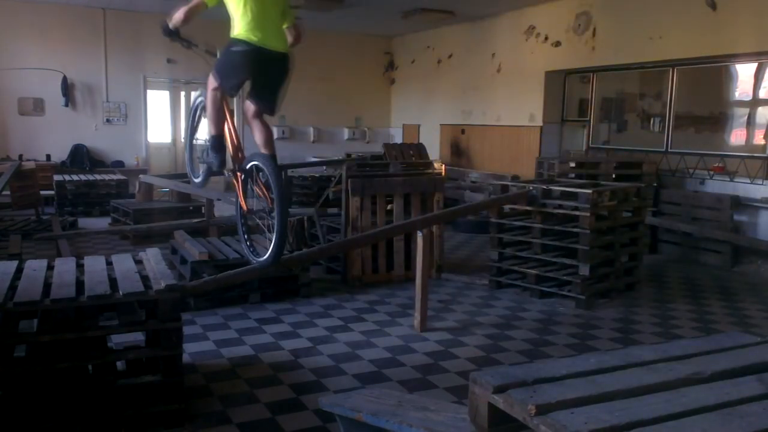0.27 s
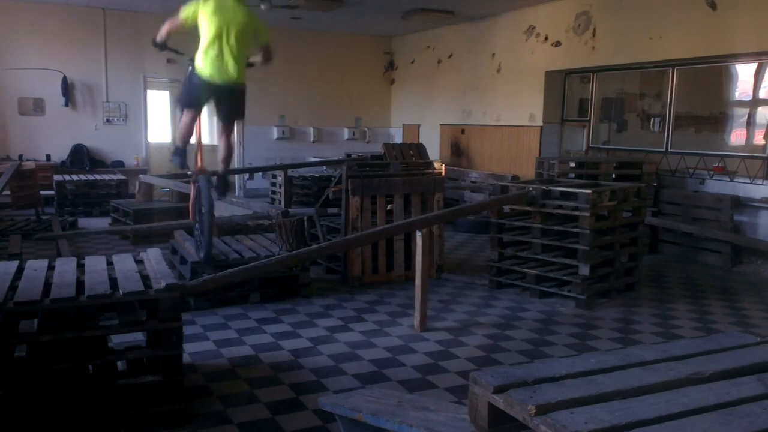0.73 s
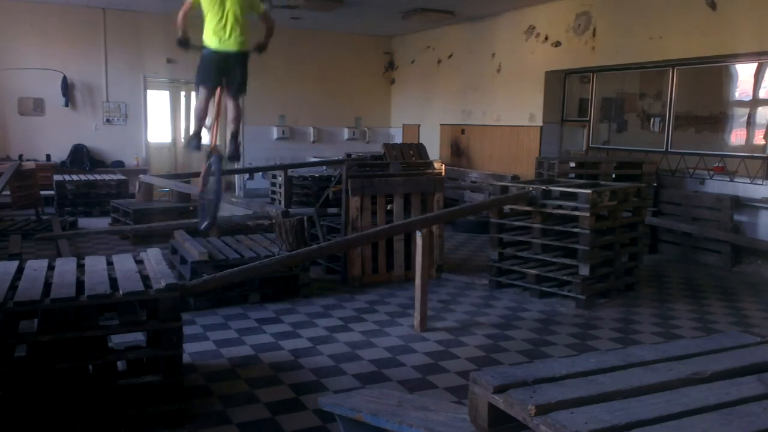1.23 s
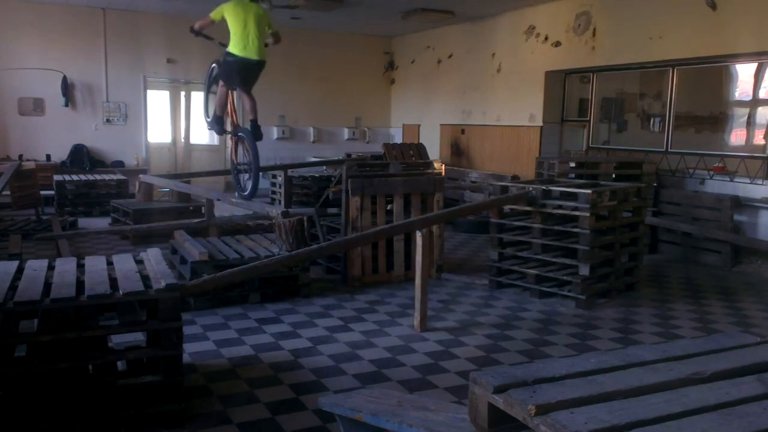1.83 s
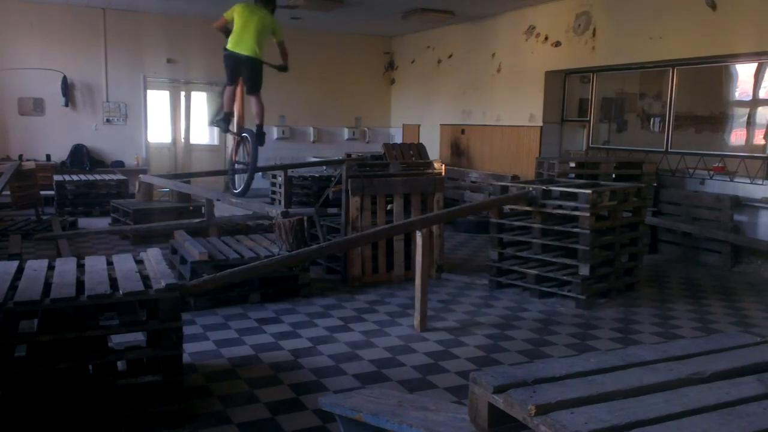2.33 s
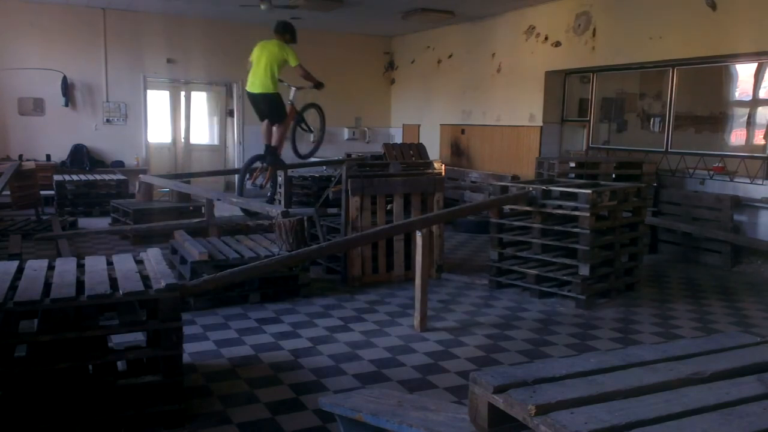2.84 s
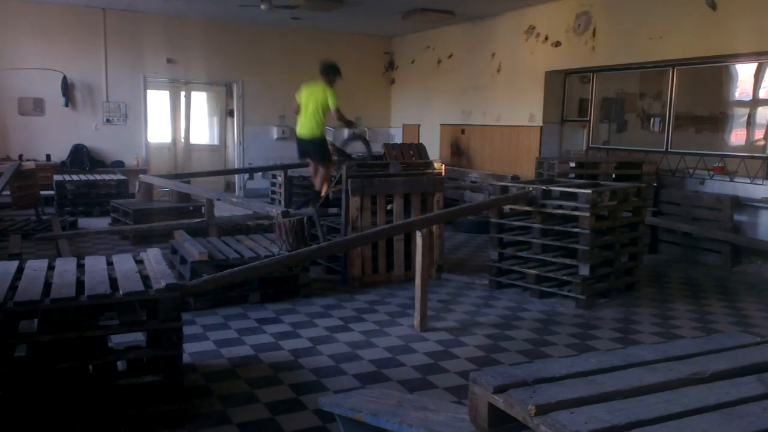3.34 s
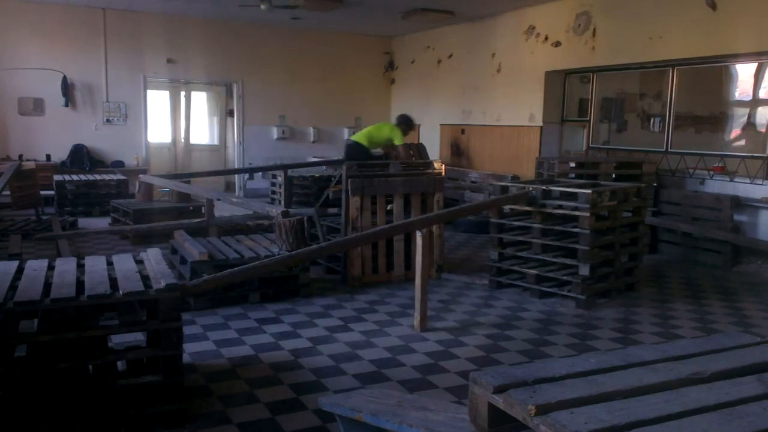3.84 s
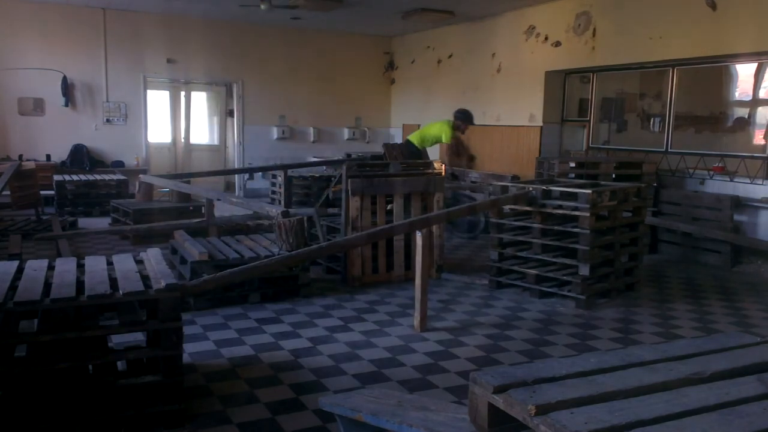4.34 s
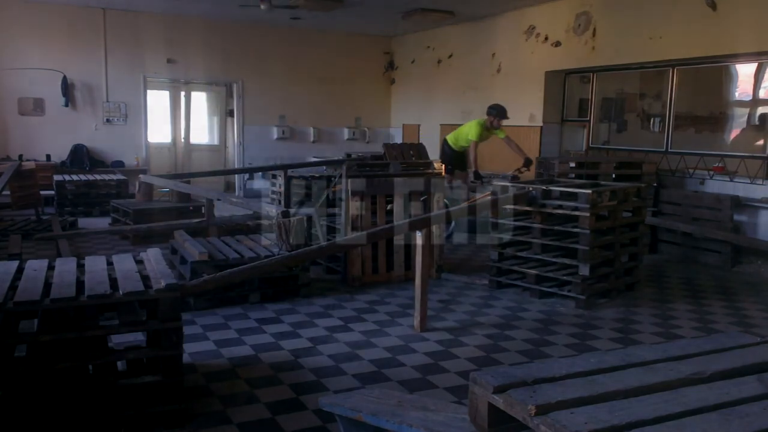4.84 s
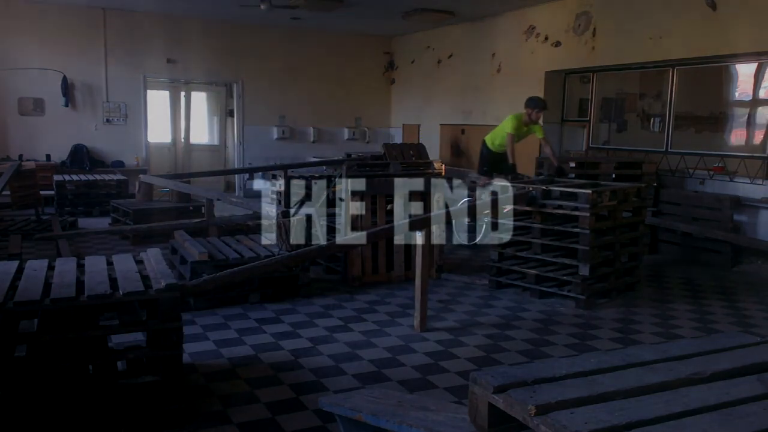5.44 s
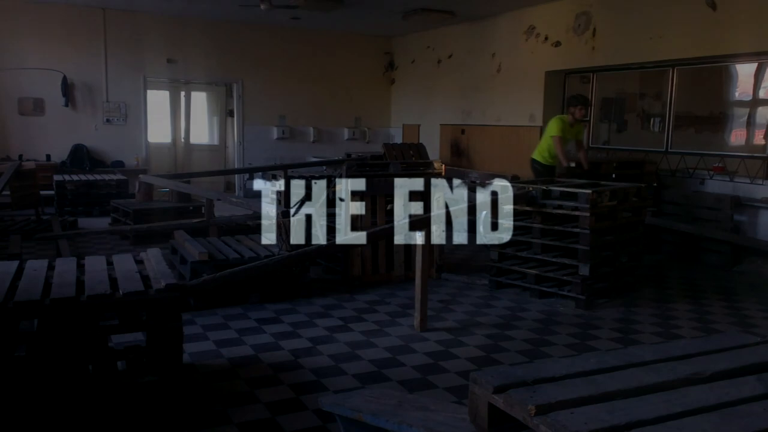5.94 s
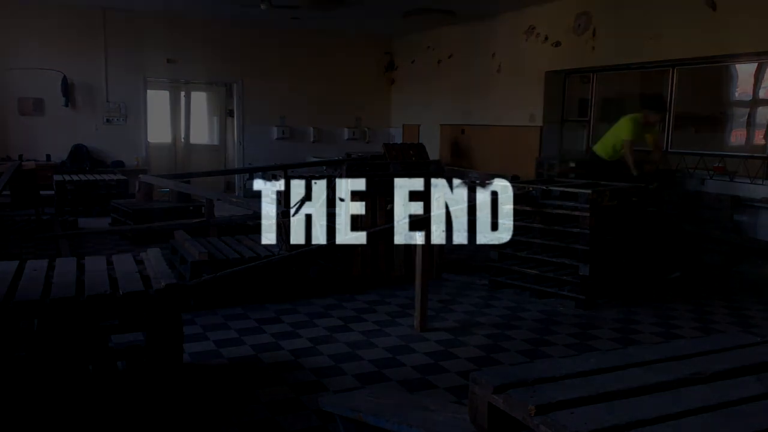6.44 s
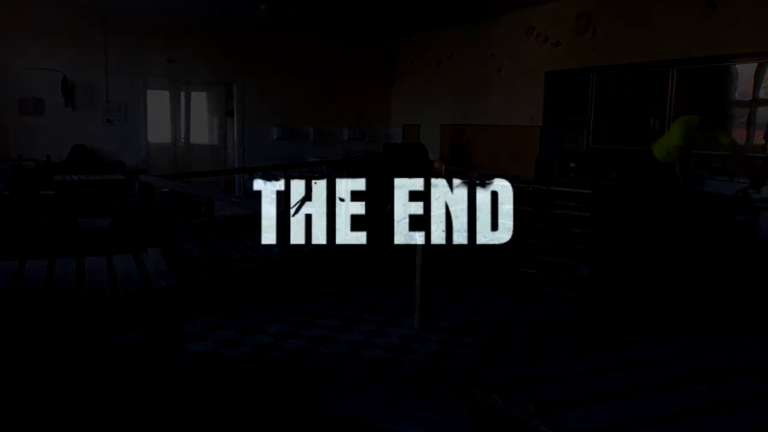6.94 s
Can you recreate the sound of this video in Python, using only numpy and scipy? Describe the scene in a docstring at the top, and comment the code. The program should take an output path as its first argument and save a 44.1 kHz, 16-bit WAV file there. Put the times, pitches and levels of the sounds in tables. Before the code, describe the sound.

In a big, bare, reverberant hall a bicycle hops over wooden pallets. Heavy tyre landings knock and rattle loose slats while the rim brakes yelp in very short, nasal squeals, often doubled. The two loudest squeals come near the end of the action, overloading slightly. Afterwards only bright hiss remains, dips almost to silence, then returns. The microphones are distant, with audibly pumping automatic gain.

```python
"""Rim brakes squeal in short stick-slip grabs as a trials rider hops a bicycle across wooden pallets and planks.
Each landing rattles the boards, a tyre nudges loose slats, and chain and frame tick; a large bare hall rings on.
Filtered noise makes the rolling tyres and a bright hiss that swells and sinks.
The microphones' automatic gain pumps, and the loudest peaks are clipped."""
import sys
import numpy as np
from scipy import signal
from scipy.fft import rfft, irfft, next_fast_len
from scipy.io import wavfile
from scipy.ndimage import uniform_filter1d

SR = 44100
rng = np.random.default_rng(int(sys.argv[2]) if len(sys.argv) > 2 else 0)


def generate_wav(signal):
    """Clip the signal to [-1, 1] and save it as 16-bit WAV at the path in sys.argv[1]."""
    frames = np.transpose(np.atleast_2d(signal))
    scaled = np.clip(frames, -1, 1) * 32767
    pcm = np.round(scaled).astype(np.int16)
    wavfile.write(sys.argv[1], SR, pcm)


N = 317075   # length in samples
TIME = np.arange(N) / SR   # seconds


def from_db(db):
    """Turn decibels into a plain multiplier."""
    return 10 ** (np.asarray(db) / 20)


def rms_one(x):
    """Scale a sound to an average (rms) level of one."""
    return x / np.sqrt(np.mean(x ** 2) + 1e-20)


def at_hz(points, hz):
    """Read a curve between its points, with frequency on a log axis."""
    freqs, values = np.transpose(points)
    return np.interp(np.log(hz + 1e-3), np.log(freqs), values)


def colour(x, points):
    """Make each frequency louder or softer along a smooth curve of (Hz, dB)."""
    length = x.shape[-1]
    size = next_fast_len(length + SR // 10)
    gain = from_db(at_hz(points, np.fft.rfftfreq(size, 1 / SR)))
    return irfft(rfft(x, size) * gain, size)[..., :length]


def butter(x, hz, kind, order=2):
    """Keep the lows, the highs or a band with a Butterworth filter."""
    sos = signal.butter(order, np.minimum(hz, .45 * SR), kind, fs=SR, output="sos")
    return signal.sosfilt(sos, x)


def add(track, s, sound):
    """Mix a sound into a track, starting at s seconds."""
    at = max(round(s * SR), 0)
    track[at:at + len(sound)] += sound[:N - at]


# how alike the sound around is at the two microphones
# columns: frequency_hz, likeness (0 unrelated, 1 the same)
LIKENESS = [(200, .75), (600, 0.21), (1100, 0.073), (2200, 0.59), (4400, 0.027), (12000, 0.043)]


def diffuse_noise(size):
    """Noise from all around: the likeness of the two microphones' sound depends on the frequency."""
    mid, side = rfft(rng.standard_normal((2, size)))
    alike = np.clip(at_hz(LIKENESS, np.fft.rfftfreq(size, 1 / SR)), -1, 1)
    shared = np.sqrt((1 + alike) / 2) * mid
    opposed = np.sqrt((1 - alike) / 2) * side * [[1], [-1]]
    return irfft(shared + opposed, size)


def swells(rows, rest_db, open_s, creep_db, creep_s):
    """A noise opens quickly, creeps to its level (from above if creep_db is negative), then sinks to rest."""
    power = from_db(rest_db) ** 2
    for start, end, db, fall_db_per_s in rows:
        age = np.maximum(TIME - start, 0)
        creep = -creep_db * np.exp(-age / creep_s)
        fall = -fall_db_per_s * np.maximum(TIME - end, 0)
        opening = np.minimum(age / open_s, 1)
        power = power + (opening * from_db(db + creep + fall)) ** 2
    return np.sqrt(power)


# the one time the background sinks away: start_s, end_s
HUSH = (5.41, 6.08)


def hush(depth_db, sink_s=0.15, return_s=0.067):
    """Gain of the background as it sinks away and quickly comes back."""
    start, end = HUSH
    sunk = 1 - np.exp(-np.maximum(TIME - start, 0) / sink_s)
    still_down = np.clip(1 - (TIME - end) / return_s, 0, 1)
    return from_db(depth_db * sunk * still_down)


# tyres roll and scuff between the hops; the last row is the rider walking # columns: start_s, end_s, level_db
# (before the hush and the microphones)
ROLLS = [(0.093, 0.332, -57), (1.153, 1.254, -51), (1.903, 2.4, -59.5), (2.676, 3.14, -49),
         (3.298, 4.353, -53.5), (6.307, 7.304, -66)]
# colour of the tyre noise, as a shape only
# columns: frequency_hz, level_db (per Hz)
ROLL_COLOUR = [(120, -31.5), (280, -10), (700, 1.5), (1500, 3.5), (2000, -5), (3100, 8), (5000, -9.5),
               (12000, -31.5)]


def rolling_tyres(fall_db_per_s=26.5, rest_db=-72.5, hush_db=-12.5):
    """Rolling and scuffing is a steady noise that swells and sinks; at rest, the hall's faint noise remains."""
    rows = [(start, end, db, fall_db_per_s) for start, end, db in ROLLS]
    gain = swells(rows, rest_db, open_s=0.018, creep_db=-2.0, creep_s=0.093)
    noise = rms_one(colour(diffuse_noise(N), ROLL_COLOUR))
    return hush(hush_db) * gain * noise


# a tyre nudges a loose slat
# columns: start_s, level_db (before the boards ring), clatter_s (time to fade to 37 %), low_edge_hz, brightness_hz
BUMPS = [(.1, -58, 0.0033, 1150, 4060), (1.15, -47.5, .08, 704, 3000), (2.37, -50.5, .04, 250, 2020),
         (2.671, -45.5, 0.058, 199.7, 2612), (2.742, -46.5, .06, 200, 2000), (4.199, -46, .012, 710, 4000),
         (4.35, -52, .02, 300.4, 2210)]
# hops landing on the pallets; the low edge is low for a heavy landing
# columns: start_s, level_db (of the weight, before the boards ring), rebound_db (relative to the weight),
# low_edge_hz, brightness_hz (both as the weight follows)
LANDINGS = [(.421, -34.5, -7, 230, 2200), (.728, -37.5, 2.5, 250, 3624), (1.487, -36.5, 0.5, 252.5, 3040),
            (3.309, -43, -12.5, 599.5, 2500), (3.706, -39, -14, 850, 2903)]
# the tyre touches, the rider's weight follows, the pallet drops back
WEIGHT_AFTER_S, REBOUND_AFTER_S = .03, .064
TOUCH_CLATTER_S, WEIGHT_CLATTER_S, REBOUND_CLATTER_S = 0.019, 0.037, .026
TOUCH_DB, TOUCH_SHARPER = -4.5, 1.1   # the touch is lighter, and its edges are higher by this factor


def knocks():
    """List every blow on the boards: touch, weight and rebound of each landing, and the lone bumps."""
    blows = []
    for s, db, rebound_db, low_hz, bright_hz in LANDINGS:
        touch_low_hz, touch_bright_hz = low_hz * TOUCH_SHARPER, bright_hz * TOUCH_SHARPER
        blows += [(s, db + TOUCH_DB, TOUCH_CLATTER_S, touch_low_hz, touch_bright_hz),
                  (s + WEIGHT_AFTER_S, db, WEIGHT_CLATTER_S, low_hz, bright_hz),
                  (s + REBOUND_AFTER_S, db + rebound_db, REBOUND_CLATTER_S, low_hz, bright_hz)]
    return blows + list(BUMPS)


# the tones at which the boards ring
# columns: pitch_hz, level_db (relative to each other), t60_s (time to fade by 60 dB)
BOARD_MODES = [(408, -10.5, 0.056), (570.2, -9.5, 0.13), (753, -2.5, 0.11), (987, 5.5, 0.02),
               (1530, -14, .05), (2500, -9.5, 0.01)]
# broad colour of the wood, as a shape
# columns: frequency_hz, gain_db
WOOD = [(100, -14), (200, -23.5), (350, -10), (700, 0), (1400, 2), (1850, -5), (3100, 5.5), (4800, -2.5),
        (9000, 4), (14000, -24.5)]


def boards(rattles_per_s=900, first_blow=6.1, ring_db=-30, level_db=-6):
    """Each knock is one blow and a dying clatter of loose slats, all ringing the same wood."""
    clicks, t = np.zeros(N), TIME[:SR // 3]
    for s, db, clatter_s, low_hz, bright_hz in knocks():
        strength = rng.standard_normal(len(t))
        hits = rng.random(len(t)) < rattles_per_s / SR
        clatter = strength * hits * np.exp(-t / clatter_s)
        clatter[0] = first_blow
        contact = butter(butter(clatter + 1e-18, low_hz, "high"), bright_hz, "low")
        add(clicks, s, from_db(db) * rms_one(contact))
    out = clicks.copy()
    for hz, db, t60 in BOARD_MODES:
        # a resonator: r is how much of the ring survives each sample, w its turn per sample
        r, w = from_db(-60 / (t60 * SR)), 2 * np.pi * hz / SR
        ring = signal.lfilter([1, -1], [1, -2 * r * np.cos(w), r * r], clicks + 1e-18)
        out += from_db(db + ring_db) * w * ring
    return from_db(level_db) * colour(out, WOOD)


# metal ticks of chain and frame
# columns: start_s, level_db (before the hall and the microphones), pitch_hz (middle of the band)
TICKS = [(0.123, -62.5, 7500), (0.384, -43, 6500), (0.415, -48.5, 8400), (7.03, -58.5, 2830)]


def ticks(ring_s=0.0027, spread=1.22):
    """Chain and frame give brief bright ticks: bursts of noise in a narrow band."""
    out, t = np.zeros(N), TIME[:SR // 10]
    for s, db, hz in TICKS:
        burst = rng.standard_normal(len(t)) * np.exp(-t / ring_s)
        add(out, s, from_db(db) * rms_one(butter(burst, [hz / spread, hz * spread], "band")))
    return out


# brake grabs
# columns: start_s, length_s, pitch_hz (before sag and judder), level_db (before the hall and the microphones),
# judder (depth of the pitch dips, as a share of the pitch), overtones_db (added to all but the lowest tone),
# brightness_hz (reached once the pad has bitten)
SQUEALS = [(.319, .06, 866, -34, 0.078, 5.5, 1950), (.46, 0.095, 850.4, -40, .053, -4, 1800),
           (.751, 0.034, 1113, -19.5, 0.05, -1.5, 4300), (.886, 0.071, 1109, -35, 0.057, -7.5, 3700),
           (1.503, .043, 1177, -18.5, 0.039, 3.5, 2220), (1.565, 0.046, 1146, -23, .028, 0.5, 2100),
           (2.067, 0.041, 1114, -12, .026, 0, 9130), (2.14, .089, 1103, -25, 0.026, -2.5, 8570),
           (2.87, .1, 823.5, -51, 0.06, -14, 900), (3.311, 0.091, 1137, -31.5, .08, -5.5, 3503),
           (3.704, 0.088, 1101, -39, 0.099, -5, 3500), (3.933, 0.053, 1122, -9, .026, 1, 9600),
           (3.985, 0.054, 1127, -10.5, .019, -1.5, 9500)]
# tones of pad and rim, before each grab's own colour
# columns: multiple (of the pitch), level_db
OVERTONES = [(1, -0.5), (2, -7), (3, -3), (4, -7.5), (5, -11.5), (6, -12), (7, -12), (8, -14), (9, -16),
             (10, -19.5), (11, -33), (12, -55), (13, -39.5)]
# friction noise of a smooth squeal, and its rise in dB per unit of judder
FRICTION_DB, JUDDER_FRICTION_DB = -32, 279.5


def brakes(attack_s=0.0077, bloom_s=0.015, release_s=.012, sag=0.049, flutter_db=0.5, judder_flutter_db=45):
    """The pad sticks and slips on the rim at 820 to 1180 Hz; the pitch sags as it bites and lets go."""
    out = np.zeros(N)
    multiple, harmonic_db = np.transpose(OVERTONES)
    t = TIME[:SR // 4]
    for s, length, hz, db, dip, overtones_db, bright_hz in SQUEALS:
        wander, friction, *flutter = rng.standard_normal((2 + len(multiple), len(t)))

        # a bright squeal takes longer to build up
        rise_s = attack_s * (bright_hz / 9000) ** 0.62
        bite = 1 - np.exp(-(t / rise_s) ** 2)
        grip = bite / (1 + np.exp(np.minimum(2 * (t - length) / release_s, 50)))

        # the pitch locks onto the brake's resonance and drops below it whenever the pad judders
        judder = np.maximum(rms_one(butter(wander, [30, 160], "band")) - .2, 0)
        pitch_hz = hz * (1 - sag * (1 - grip) - dip * judder)
        phase = 2 * np.pi * np.cumsum(pitch_hz) / SR

        # the slips sharpen as the pad bites, so the high overtones come last
        edge_hz = bright_hz * (1 - .6 * np.exp(-t / bloom_s))
        softening = np.sqrt(1 + np.outer(multiple * hz, 1 / edge_hz) ** 6)
        strength = from_db(harmonic_db + overtones_db * (multiple > 1))[:, None] / softening

        # each tone flutters, the more so the harder the pad judders
        slow_flutter = rms_one(butter(np.array(flutter), 81, "low"))
        pressure = from_db((flutter_db + judder_flutter_db * dip) * slow_flutter)
        tone = rms_one(np.sum(strength * pressure * np.sin(np.outer(multiple, phase)), axis=0))

        friction_db = FRICTION_DB + JUDDER_FRICTION_DB * dip
        rub = butter(butter(friction, 1700, "high"), max(0.31 * bright_hz, 3300), "low")
        add(out, s, from_db(db) * grip * (tone + from_db(friction_db) * rms_one(rub)))
    return out


# swells of the hiss
# columns: start_s, end_s, level_db (before the hush and the microphones), fall_db_per_s
HISS_SWELLS = [(.41, .79, -39, 137), (1.205, 1.55, -42.5, 154), (1.875, 2.08, -48, 130),
               (2.49, 2.71, -44, 72), (3.005, 3.27, -45, 42), (3.7, 4.05, -52.5, 123),
               (4.24, 5.4, -49.5, 132), (6.1, 6.34, -51.5, 100), (6.31, 7.3, -45.5, 99.5)]
# colour of the hiss, as a shape only
# columns: frequency_hz, level_db (per Hz)
HISS_COLOUR = [(88, -69), (150, -38), (331, -22.5), (505, -20), (545, -16.5), (589, -18.5), (972, -13.5),
               (1250, -15.5), (1350, -12.5), (2020, -19), (3600, -1), (4290, -8.5), (9090, -5.5),
               (13900, -23.5), (15000, -49.5)]


def bright_hiss(rest_db=-63, hush_db=-27.5):
    """A bright noise swells and sinks back to a faint rest level."""
    gain = swells(HISS_SWELLS, rest_db, open_s=0.036, creep_db=6.5, creep_s=0.082)
    noise = rms_one(colour(diffuse_noise(N), HISS_COLOUR))
    return hush(hush_db) * gain * noise


# how long the hall rings on
# columns: frequency_hz, t60_s (time to fade by 60 dB)
HALL_T60 = [(200, 1.3), (600, 1.03), (1100, 0.98), (2300, 0.8), (4400, 0.66), (8000, 0.47), (14000, 0.091)]


def hall(x, tail_db=2, build_s=0.0025, early_db=3, early_s=0.018, even_hz=30):
    """Strong early reflections, then a long tail whose treble dies first, all made of fading noise."""
    t = TIME[:2 * SR]
    noise, freqs = rfft(diffuse_noise(len(t))), np.fft.rfftfreq(len(t), 1 / SR)
    # the hall's modes lie so densely that no narrow band stands out: even out the noise across about 30 Hz of
    # neighbouring frequencies
    window = dict(nperseg=4096, noverlap=3072)
    _, _, frames = signal.stft(irfft(noise), **window)
    even_frames = max(round(even_hz * 4096 / SR), 2)
    local_power = uniform_filter1d(abs(frames) ** 2, size=even_frames, axis=1)
    _, evened = signal.istft(frames / np.sqrt(abs(local_power) + 1e-20), **window)
    noise = rfft(rms_one(evened[:, :len(t)]))

    # cut the noise into overlapping bands, and let each fade at its own pace
    centres = np.geomspace(150, 15000, 12)
    tail = 0
    for hz, share in zip(centres, np.eye(len(centres))):
        band = irfft(noise * np.interp(freqs, centres, share))
        tail = tail + band * np.exp(-np.log(1000) * t / at_hz(HALL_T60, hz))
    early_boost = from_db(early_db * np.exp(-t / early_s))
    tail *= (1 - np.exp(-t / build_s)) * early_boost / np.sqrt(SR / 10)
    return from_db(tail_db) * signal.fftconvolve(x[None], tail, axes=1)[:, :N]


def scene(brake_direct_db=-6.0, wood_direct_db=-17):
    """The rider is far off, so the hall outweighs the direct sound; tyre noise and hiss are mixed in below."""
    background = rolling_tyres() + bright_hiss()
    knock = boards() + ticks()
    squeal = brakes()
    direct = from_db(brake_direct_db) * squeal + from_db(wood_direct_db) * knock
    return direct + hall(squeal + knock) + background


# automatic gain: faint sound is held down, the loudest reined in
# columns: input_db (midrange level), gain_db
GAIN_LAW = [(-43.5, 2), (-36.5, 4), (-27.5, 8), (-12.5, 5)]


def automatic_gain(x, window_s=.03):
    """The gain follows the level of the midrange, looking a little ahead."""
    midrange = butter(x, [400, 4000], "band")
    power = uniform_filter1d(np.mean(midrange ** 2, axis=0), max(round(window_s * SR), 1))
    level_db = 10 * np.log10(abs(power) + 1e-14)
    return x * from_db(np.interp(level_db, *np.transpose(GAIN_LAW)))


# the two microphones' colour
# columns: frequency_hz, left_minus_right_db
BALANCE_DB = [(300, 1), (1100, 0.5), (3300, 0.5), (4500, -0.5), (6500, -3.5), (7700, 0.5), (9000, 6.5),
              (14000, 3.5)]


def record(dry, low_cut_hz=210, top_cut_hz=15600, ceiling=.92, trough=0.94):
    """Each microphone has its own colour; then low cut, automatic gain, lopsided overload and top cut."""
    pair = []
    for x, side in zip(dry, (1, -1)):
        pair.append(colour(x, [(hz, side * db / 2) for hz, db in BALANCE_DB]))
    levelled = automatic_gain(butter(np.array(pair), low_cut_hz, "high", order=4))
    overloaded = np.clip(levelled, -trough, ceiling)
    top_cut = signal.ellip(10, .1, 70, top_cut_hz, fs=SR, output="sos")
    return signal.sosfilt(top_cut, overloaded)


dry = scene()
out = record(dry)
generate_wav(out)
```